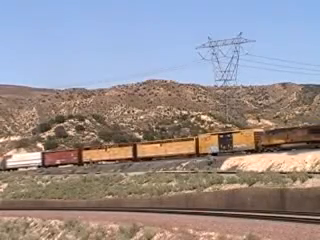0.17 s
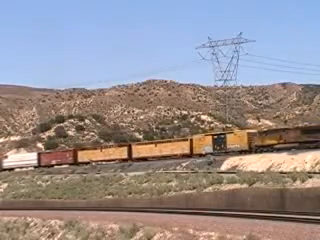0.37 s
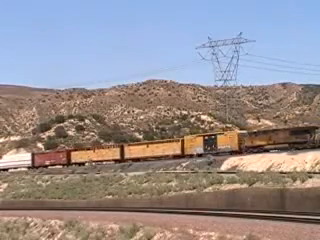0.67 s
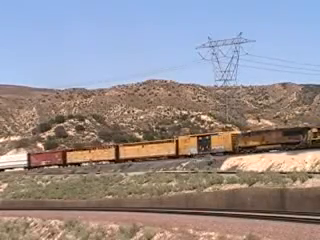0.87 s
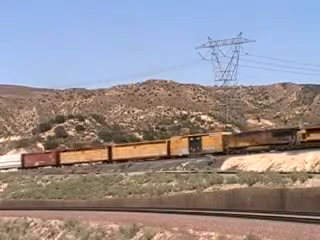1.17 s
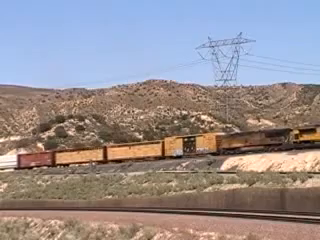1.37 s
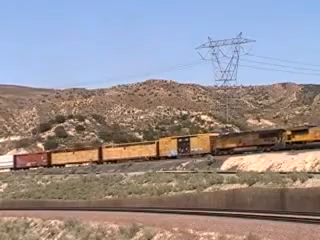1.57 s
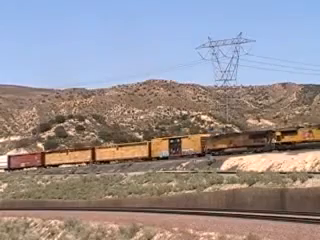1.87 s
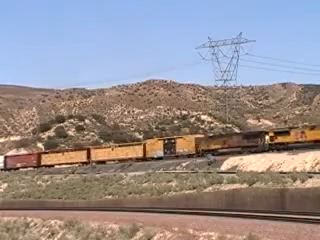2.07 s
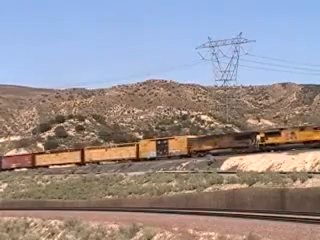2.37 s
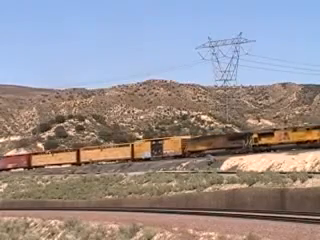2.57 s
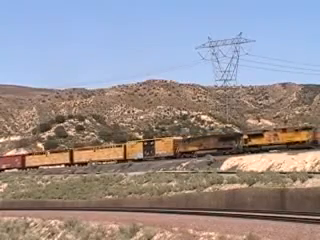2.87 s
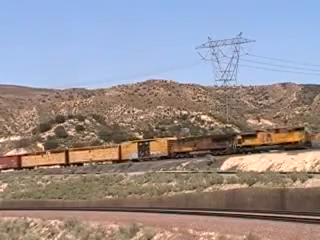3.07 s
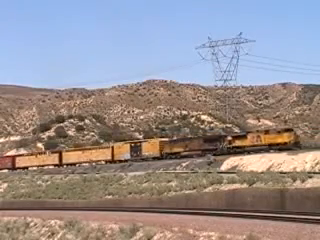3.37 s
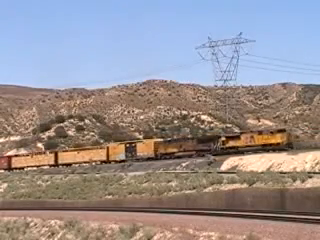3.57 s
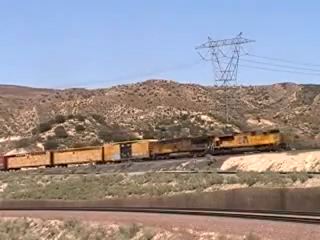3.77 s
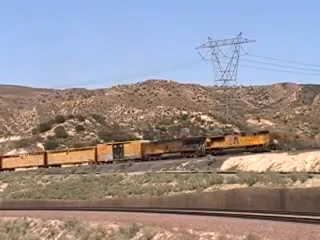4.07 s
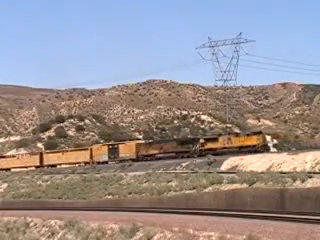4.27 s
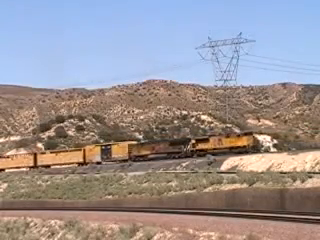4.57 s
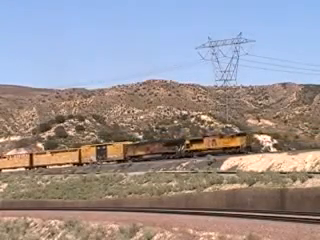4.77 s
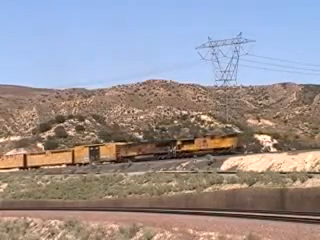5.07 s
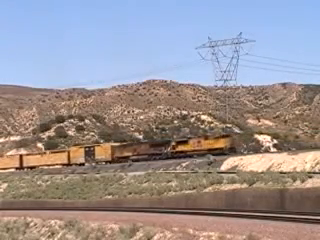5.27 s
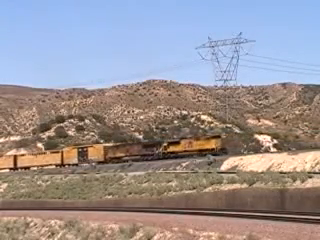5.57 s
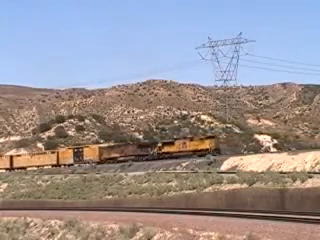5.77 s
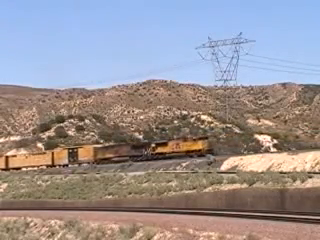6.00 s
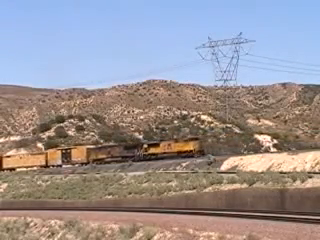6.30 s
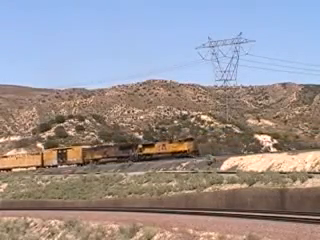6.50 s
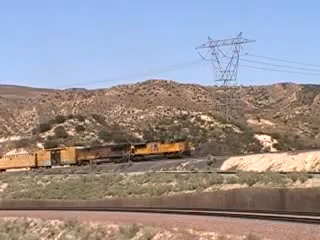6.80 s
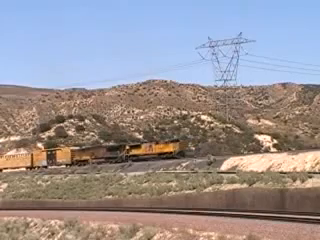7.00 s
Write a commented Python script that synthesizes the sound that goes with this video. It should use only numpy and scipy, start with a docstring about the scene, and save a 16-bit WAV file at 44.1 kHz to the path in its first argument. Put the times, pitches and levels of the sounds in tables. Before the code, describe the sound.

A freight train moves away along a dry hillside, heard from far across an open valley by a fixed microphone. It is already sounding at 0 s: a soft, broad roar of wheels and fan air, with steady whining tones around 850 and 1120 Hz from two engines' cooling fans. The fans are slightly apart in pitch, beating about five times a second, and moving air makes everything waver. The whine peaks near 1.3 s, with the roar brightening around 1.5 s. A hollow exhaust drone near 440 Hz swells from 1.2 s, dips around 2.2, returns until 3.2, then comes in broken surges. Thin higher whines drift in and out. Around 4.4 s the main whine sinks low; after 5 s it returns, mostly from one fan. The roar continues, losing treble until 7.1 s. Faint hiss and tiny high buzzing remain beneath.

```python
"""Heard across a wide valley, a freight train rolls away along a dry hillside, its two engines last.
From the start, cooling-fan harmonics (sines) whine and beat over a noise roar of wheels and air; they peak near 1.3 s.
Weak blurred noise bands and wavering whines lie among them; a resonant exhaust drone swells, then breaks up after 3.2 s.
The fan whine sinks low near 4.4 s and returns after 5 s, mostly from the faster fan, while the roar loses treble.
Moving air wavers the tones throughout, over faint camera hiss and a buzz of ringing frame-rate ticks."""
import sys
import numpy as np
from scipy import signal
from scipy.fft import rfft, irfft
from scipy.io import wavfile

SR = 44100
rng = np.random.default_rng(int(sys.argv[2]) if len(sys.argv) > 2 else 0)


def wav_record(signal):
    """Record a signal, one row per channel, as 16-bit PCM in the file named by sys.argv[1]."""
    frames = np.transpose(np.atleast_2d(signal))
    bounded = np.clip(frames, -1, 1)
    # unit amplitude maps onto the largest positive 16-bit level
    quanta = np.round(bounded * 32767).astype(np.int16)
    wavfile.write(sys.argv[1], SR, quanta)


N = 314874  # length in samples

# Camera hiss colour, relative: f/Hz, density/dB
HISS_COLOUR = [(100, 2), (5000, -3), (8700, -8), (9100, -12), (11000, -10)]
HISS_DB = -74.5
# High resonances rung by the frame ticks: f/Hz, width/Hz, level/dB
BUZZ_RINGS = [(6040, 200, -98.5), (6250, 200, -99), (7000, 400, -101), (7500, 200, -101), (7850, 160, -98),
              (8620, 300, -99)]
FRAME_HZ, CUTOFF_HZ = 29.97, 10000

# Roar of wheels and fan air, thinning with distance; only movement about each mean is used:
# t/s, bass level/dB, middle level/dB, treble level/dB
ROAR_SWELLS = [(0, -48.5, -48, -44.5), (0.55, -51.5, -41.5, -42.5), (1.1, -49.5, -47, -46),
               (1.55, -52, -36, -42.5), (1.85, -52, -43, -46.5), (2.5, -52.5, -46.5, -45.5),
               (3.1, -53.5, -47, -47), (3.9, -50.5, -49.5, -51), (4.55, -53, -47, -48.5),
               (5.0, -50, -49.5, -49), (5.7, -50.5, -48.5, -49), (6.3, -49.5, -49, -50.5),
               (6.55, -48.5, -48.5, -52.5), (7.14, -50, -49, -53)]
# Roar colour, relative, with ground-echo dips near 120, 350 and 1000 Hz: f/Hz, density/dB
ROAR_COLOUR = [(25, -36), (40, -27.5), (68, -11), (115, -17), (195, -5), (330, -9), (445, -1), (600, -6),
               (850, -2), (960, -4.5), (1040, -10.5), (1090, -8.5), (1160, -8), (1300, -8.5), (2250, -18),
               (2450, -24), (3100, -27.5), (4300, -43.5), (5200, -63), (7000, -82)]
# How far the roar follows each swell: f/Hz, bass share, middle share, treble share
SWELL_SHARES = [(90, 0, 0.1, 0.046), (200, 0.68, 0, 0.065), (480, 0.033, 0.07, 0.24),
                (800, 0.28, 0.62, 0.051), (2000, 0.25, 0.0031, 0.75)]
ROAR_DB = -38.5  # before swells and flutter

# Hollow drone of the engines' exhaust: t/s, level/dB
DRONE_LEVEL = [(0, -53), (.6, -54.5), (1.0, -54), (1.2, -46), (1.9, -47.5), (2.25, -55.5), (2.6, -45.5),
               (3.2, -44.5), (3.6, -61), (3.95, -52), (4.4, -70), (5.15, -46), (5.65, -66), (6.05, -45),
               (6.6, -64), (6.95, -52), (7.14, -62)]
DRONE_HZ, DRONE_WIDTH_HZ = 439.4, 60  # width of each of two passes

# Weak blurred bands: motor tones, a high fan harmonic and broad bumps in the roar: f/Hz
BAND_HZ = [353, 527, 563, 615, 770, 862, 882, 1758, 2535, 2660, 3332]
# One row per blurred band: width of each of two passes/Hz, level before fades and swell/dB
BAND_SHAPES = [(8, -70), (14.2, -52.5), (8.6, -60), (8.05, -57.5), (25, -70), (10, -60), (10, -58),
               (10, -73.5), (16, -81), (90, -75), (16, -83.5)]
BANDS_FOLLOW = 0.34  # share of the middle swell

# Clearer tones that come and go: f/Hz
WHINE_HZ = [666, 1178, 1250, 1324, 1402, 1414, 1469, 1481, 1690, 1979, 2801, 2811, 3027]
# One row per whine: level before movement/dB, share of treble swell, rms phase spread/turns
WHINES = [(-56, 0.37, 0.2), (-66, .5, .1), (-63.5, 0.63, 0.11), (-63.5, 0.39, 0.13), (-61, 0.41, 0.15),
          (-61.5, 0.5, 0.22), (-61, 1.0, 0.12), (-64.5, 0.91, 0.076), (-66, 0.74, 0.059), (-70.5, 0.63, .1),
          (-77.5, 0.98, 0.14), (-78.5, 0.97, 0.22), (-81, 0.81, .06)]
# Moments when a whine stands out: peak t/s, length/s, f/Hz, lift/dB
CLEAR_SPELLS = [(.5, .66, 3027, 16), (1.78, .26, 3027, 14), (3.15, 1.05, 3027, 8), (4.75, .35, 3027, 3),
                (1.4, .7, 2801, 8), (2.6, .6, 2801, 8), (4.9, .5, 2801, 6), (6.5, .4, 2801, 8),
                (3.0, .3, 2811, 9), (3.4, .3, 2811, 7), (4.8, .3, 2811, 6), (5.48, .3, 2811, 13),
                (1.2, .25, 1979, 6), (2.0, .3, 1979, 6), (2.9, .5, 1979, 6), (5.55, .45, 1979, 9),
                (6.2, .6, 1979, 7), (.4, .65, 1690, 6), (2.15, 1.9, 1690, 6), (4.4, .6, 1690, 8),
                (.8, .65, 1481, 11), (1.4, .2, 1481, 6), (.4, .3, 1469, 4), (1.65, .8, 1469, 5),
                (2.9, .7, 1469, 5), (4.3, .4, 1469, 5), (5.6, .5, 1469, 5), (1.85, 1.05, 1414, 10),
                (2.8, .35, 1414, 5), (3.8, .2, 1414, 5), (4.5, .85, 1414, 10), (5.8, .3, 1414, 8),
                (6.4, .3, 1414, 7), (.65, .4, 1402, 4), (1.6, .3, 1402, 9), (3.2, .25, 1402, 5),
                (4.0, .25, 1402, 5), (4.55, .4, 1402, 5), (5.45, .8, 1402, 11), (6.2, .25, 1402, 8),
                (6.6, .25, 1402, 6), (.4, .65, 1324, 8), (1.35, .4, 1324, 6), (3.05, .4, 1324, 3),
                (4.0, .25, 1324, 4), (5.75, 1.3, 1324, 7), (6.95, .4, 1324, 6), (.42, .3, 1250, 9),
                (1.7, .7, 1250, 7), (2.4, .25, 1250, 5), (4.5, .4, 1250, 3), (.72, .4, 1178, 9),
                (1.6, .4, 666, 5), (3.3, .2, 666, 5), (3.9, .5, 666, 3), (4.75, .25, 666, 5),
                (5.15, .3, 666, 4), (5.65, .2, 666, 6), (6.1, .35, 666, 5), (6.95, .35, 666, 6)]
FADE_DB, FADE_RATE_HZ = 1.5, 3  # rms depth and low-pass corner of fades in moving air

# Blade rate of the faster fan, sinking as the engines turn away: t/s, f/Hz
BLADE_RATE = [(0, 282.1), (3.0, 281.7), (7.14, 280.8)]
# Third harmonics: t/s, beat lead/turns, faster fan level/dB, slower fan level/dB
THIRDS = [(0.0, 0.17, -40, -37), (0.06, 0.2, -51, -45), (0.13, 0.3, -43, -41.5), (0.2, 0.37, -47.5, -48),
          (0.4, 0.57, -59, -43), (0.61, 0.55, -34.5, -43), (0.76, 0.39, -52.5, -42.5),
          (0.84, 0.39, -46, -41), (0.9, 0.35, -39, -50), (0.95, 0.3, -49, -53), (1.04, 0.34, -41, -52),
          (1.11, 0.44, -35, -52), (1.28, 0.39, -28, -31), (1.45, 0.15, -35.5, -40), (1.57, 0.4, -33.5, -39),
          (1.7, 0.35, -39, -48), (1.83, 0.69, -40, -42.5), (1.9, 0.66, -34, -44), (2.0, 0.61, -35.5, -41.5),
          (2.07, 0.5, -35, -45.5), (2.29, 0.54, -32, -32), (2.52, 0.45, -48.5, -34),
          (2.64, 0.95, -41, -42.5), (2.88, 0.66, -34.5, -33.5), (3.1, 0.52, -40, -42.5),
          (3.22, 0.65, -37, -43.5), (3.34, 0.44, -43, -44), (3.55, 0.48, -48, -44.5),
          (3.75, 0.51, -45, -43.5), (3.93, 0.8, -49, -46), (4.15, 0.52, -51, -51), (4.35, 0.49, -64, -55),
          (4.55, 0.57, -56, -55.0), (4.72, 0.82, -48.5, -55), (4.95, 0.81, -42, -57),
          (5.06, 0.77, -44.5, -47.5), (5.15, 0.77, -40, -45), (5.23, 0.88, -40, -47),
          (5.35, 0.96, -47, -52), (5.53, 0.97, -41, -49), (5.72, 0.96, -36, -48), (5.9, 1.8, -48, -65),
          (6.03, 1.2, -35.5, -50.5), (6.15, 0.94, -38.5, -46), (6.25, 0.86, -37, -45),
          (6.35, 1.12, -44, -44), (6.45, 1.11, -38.5, -43), (6.6, 1.02, -39, -40.5),
          (6.8, 1.08, -41, -49.5), (6.95, 1.06, -41, -48), (7.14, 0.74, -44.5, -48)]
# First harmonic before fades and blur: t/s, level/dB
FIRST_LEVEL = [(0, -53), (0.9, -60.5), (1.6, -53.5), (2.2, -63), (3.5, -60), (4.6, -58), (5.15, -64.5),
               (5.75, -50), (6.3, -55.5), (6.6, -53.5), (7.14, -49)]
# Fourth harmonic before blur: t/s, level/dB
FOURTH_LEVEL = [(0.0, -57), (0.04, -59), (0.08, -50), (0.2, -42.5), (0.3, -46), (0.46, -39.5), (0.52, -45),
                (0.55, -42), (0.61, -53), (0.65, -37.5), (0.75, -52), (0.83, -43), (0.87, -51),
                (0.95, -37.5), (1.09, -52), (1.19, -39), (1.25, -49), (1.31, -48), (1.35, -50), (1.4, -40),
                (1.47, -38.5), (1.83, -46.5), (1.87, -39), (1.93, -52), (1.95, -39), (2.03, -41.5),
                (2.13, -59.5), (2.26, -36), (2.34, -45.5), (2.42, -38.5), (2.6, -41), (2.74, -51),
                (2.8, -43.5), (2.96, -55.5), (3.04, -46.5), (3.78, -58.5), (4.02, -47), (4.16, -59),
                (4.32, -43), (4.51, -55.5), (4.6, -43), (4.67, -45), (4.79, -42.5), (4.83, -47.5),
                (5.17, -53.5), (5.27, -44), (5.63, -57.5), (5.65, -49), (5.79, -50), (5.85, -58),
                (5.93, -48), (6.24, -46), (6.34, -53.5), (6.84, -46), (6.96, -60), (7.04, -56), (7.08, -63),
                (7.14, -60)]
# Fourth-harmonic pitch before phase waver, wandering between the two fans' fourths: t/s, f/Hz
FOURTH_PITCH = [(0, 1124), (.3, 1126), (.55, 1123.5), (1.0, 1126), (1.45, 1124), (1.85, 1127.5),
                (2.1, 1125.5), (2.5, 1126.5), (3.3, 1126.5), (3.9, 1123.5), (4.35, 1127), (4.7, 1125),
                (5.4, 1123.5), (5.75, 1121), (6.05, 1125), (6.6, 1125), (7.14, 1121)]
BEAT_HZ = 4.8  # steady part of the beat between third harmonics; the lead shifts it


def from_db(db):
    """Decibels to gain."""
    return 10 ** (np.asarray(db) / 20)


def rms_one(x):
    """Scale to unit power."""
    return x / np.sqrt(np.mean(x ** 2) + 1e-20)


def in_time(rows):
    """Join curve rows by straight lines, one array per column after the time."""
    s, *columns = np.transpose(rows)
    return [np.interp(np.arange(N) / SR, s, column) for column in columns]


def at_hz(points, hz):
    """Read a spectrum on a log-frequency axis."""
    point_hz, level_db = np.transpose(points)
    return np.interp(np.log(hz), np.log(point_hz), level_db)


def drift(rate_hz):
    """Slow random movement of spread 1: coarse noise through two one-pole low-passes."""
    step = 40  # samples between noise points
    r = np.exp(-2 * np.pi * step * rate_hz / SR)
    noise = rng.standard_normal(N // step + 2002)
    slow = signal.lfilter([1], [1, -2 * r, r * r], noise)[2000:]  # drop the filter's settling
    return np.interp(np.arange(N) / step, np.arange(len(slow)), rms_one(slow - slow.mean()))


def resonance(x, hz, width_hz):
    """Two-pole resonance, with a gain of about 1 at its peak."""
    r = np.exp(-np.pi * width_hz / SR)
    poles = [1, -2 * r * np.cos(2 * np.pi * hz / SR), r * r]
    return signal.lfilter([(1 - r * r) / 2, 0, (r * r - 1) / 2], poles, x)


def resonant_twice(x, hz, width_hz):
    """Two equal resonances in series, for steeper sides."""
    return resonance(resonance(x, hz, width_hz), hz, width_hz)


def coloured(colour):
    """Spectrum of steady noise with this colour, and its frequencies."""
    hz = np.maximum(np.fft.rfftfreq(N, 1 / SR), 1)
    return rfft(rng.standard_normal(N)) * from_db(at_hz(colour, hz)), hz


def camera():
    """Circuit hiss, and two unequal ticks a frame that ring in a few high resonances."""
    spectrum, _ = coloured(HISS_COLOUR)
    hiss = from_db(HISS_DB) * rms_one(irfft(spectrum, N))
    half_frames = np.floor(np.arange(N + 1) * 2 * FRAME_HZ / SR)
    ticks = np.diff(half_frames) * (1 - .75 * (half_frames[1:] % 2))  # every other tick at a quarter
    buzz = sum(from_db(level_db) * rms_one(resonance(ticks, hz, width_hz))
               for hz, width_hz, level_db in BUZZ_RINGS)
    return hiss + buzz


def roar(swells_db):
    """Wheel and fan-air noise in overlapping bands that share the swells and flutter in the wind."""
    spectrum, hz = coloured(ROAR_COLOUR)
    scale = np.std(irfft(spectrum, N))
    out = np.zeros(N)
    centres = np.geomspace(25, 6400, num=17)  # half an octave apart
    share_hz, *shares = np.transpose(SWELL_SHARES)
    for k, centre in enumerate(centres):
        window = np.interp(np.log(hz), np.log(centres), np.arange(len(centres)) == k)
        swell_db = sum(np.interp(np.log(centre), np.log(share_hz), share) * db
                       for share, db in zip(shares, swells_db))
        flutter_db = 0.7 * drift(7.8)
        out += from_db(swell_db + flutter_db) * irfft(spectrum * window, N)
    return from_db(ROAR_DB) * out / scale


def drone():
    """Noise in one broad exhaust resonance, swelling unevenly."""
    band = resonant_twice(rng.standard_normal(N), DRONE_HZ, DRONE_WIDTH_HZ)
    return from_db(in_time(DRONE_LEVEL)[0]) * rms_one(band)


def blurred_bands():
    """Motor tones, a high fan harmonic and roar bumps: bands of one noise, each fading on its own."""
    white = rng.standard_normal(N)
    out = np.zeros(N)
    for hz, (width_hz, level_db) in zip(BAND_HZ, BAND_SHAPES):
        fade_db = 1.5 * drift(.7)
        out += from_db(level_db + fade_db) * rms_one(resonant_twice(white, hz, width_hz))
    return out


def whines(treble_db):
    """Sines whose level and phase waver in moving air; clear spells lift them for a moment."""
    s, out = np.arange(N) / SR, np.zeros(N)
    for hz, (level_db, share, waver) in zip(WHINE_HZ, WHINES):
        # steep-sided humps, down to 1/e of the lift at half a length from the peak
        spells_db = sum(lift_db * np.exp(-(2 * (s - at) / length) ** 6)
                        for at, length, spell_hz, lift_db in CLEAR_SPELLS if spell_hz == hz)
        air_db = FADE_DB * drift(FADE_RATE_HZ) + 1.5 * drift(9.2)
        gain = from_db(level_db + share * treble_db + spells_db + air_db)
        out += np.sqrt(2) * gain * np.cos(2 * np.pi * (hz * s + waver * drift(4.8)))
    return out


def blurred_tone(cycles, level_db, blur_db, waver):
    """Cosine whose level and phase are blurred by moving air."""
    gain = from_db(level_db + blur_db * drift(9.6))
    return gain * np.cos(2 * np.pi * (cycles + waver * drift(2.3)))


def fans():
    """Faster fan's first and third harmonics, slower fan's third, a fourth with its own wandering pitch."""
    s = np.arange(N) / SR
    turns = np.cumsum(in_time(BLADE_RATE)[0]) / SR
    lead, fast_db, slow_db = in_time(THIRDS)
    fast_third = from_db(fast_db) * np.cos(2 * np.pi * 3 * turns)
    slow_third = from_db(slow_db) * np.cos(2 * np.pi * (3 * turns - BEAT_HZ * s - lead))
    first_db = in_time(FIRST_LEVEL)[0] + FADE_DB * drift(FADE_RATE_HZ)
    first = blurred_tone(turns, first_db, blur_db=1.8, waver=.2)
    fourth_cycles = np.cumsum(in_time(FOURTH_PITCH)[0]) / SR
    fourth = blurred_tone(fourth_cycles, in_time(FOURTH_LEVEL)[0], blur_db=.7, waver=.04)
    return np.sqrt(2) * (fast_third + slow_third + first + fourth)  # table levels are rms


def scene():
    """Fans, whines, blurred bands, drone and roar, all from far off."""
    swells_db = [level - level.mean() for level in in_time(ROAR_SWELLS)]
    _, middle_db, treble_db = swells_db
    tones = fans() + whines(treble_db)
    tones += from_db(BANDS_FOLLOW * middle_db) * blurred_bands()
    return (tones + drone() + roar(swells_db))[None]


def record(dry):
    """The camera adds its own noise; the start is eased in and the top is cut."""
    ease_in = np.minimum(np.arange(N) / (.002 * SR), 1)  # 2 ms
    eased = (dry + camera()) * ease_in
    top_cut = signal.ellip(14, .3, 60, CUTOFF_HZ, fs=SR, output="sos")
    return signal.sosfilt(top_cut, eased)


dry = scene()
out = record(dry)
wav_record(out)
```